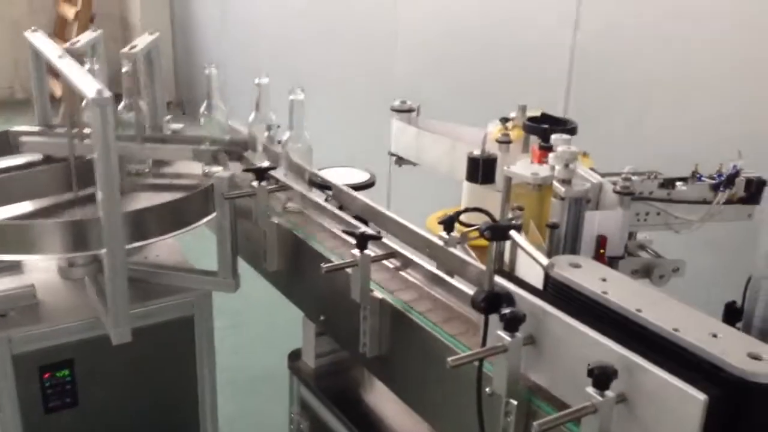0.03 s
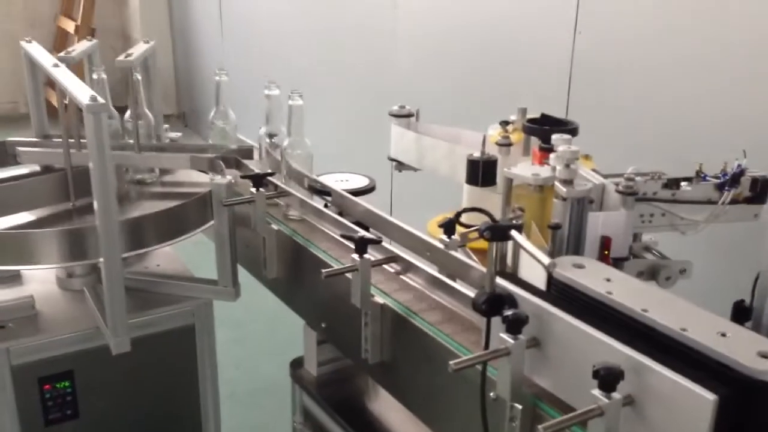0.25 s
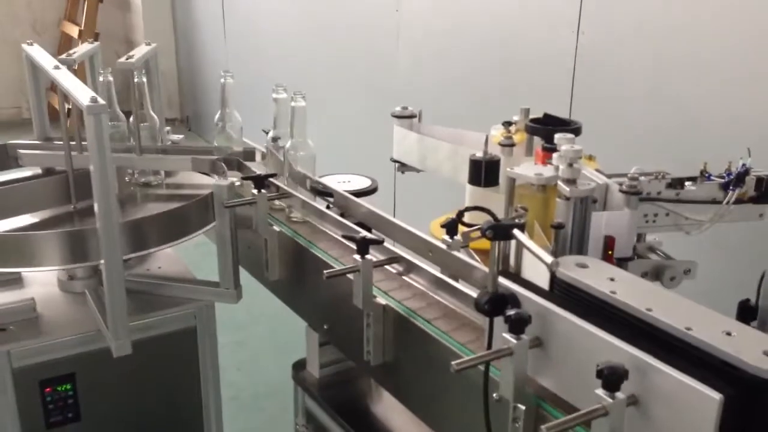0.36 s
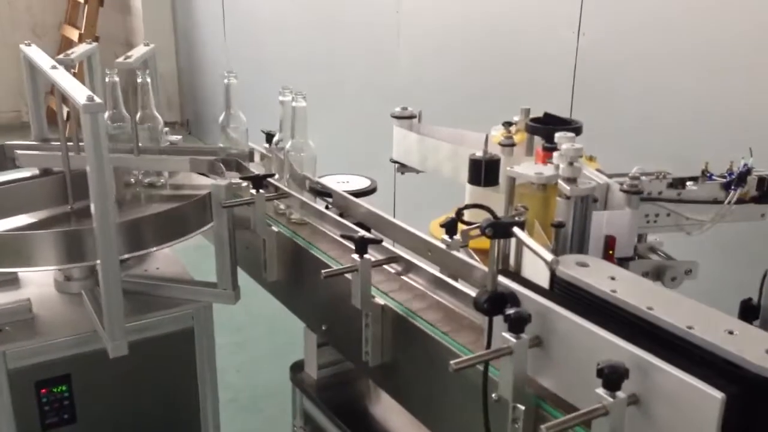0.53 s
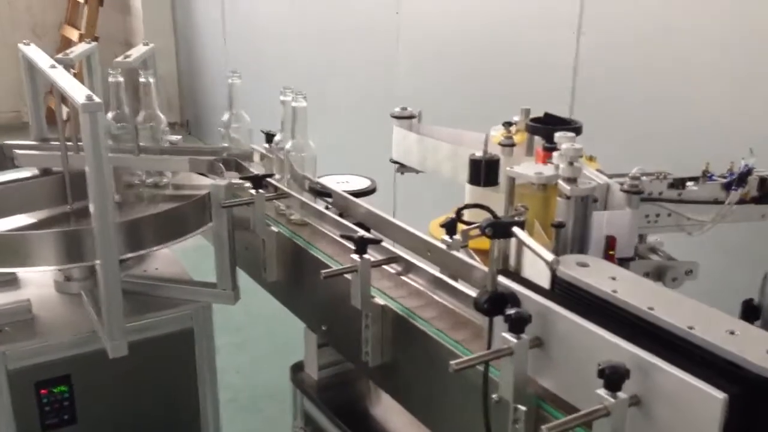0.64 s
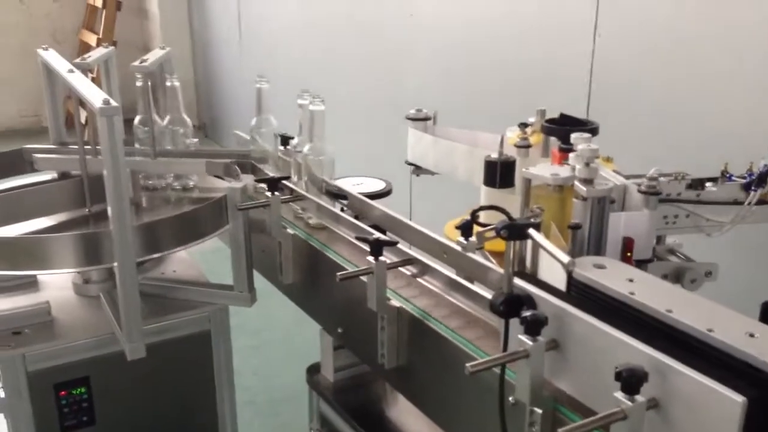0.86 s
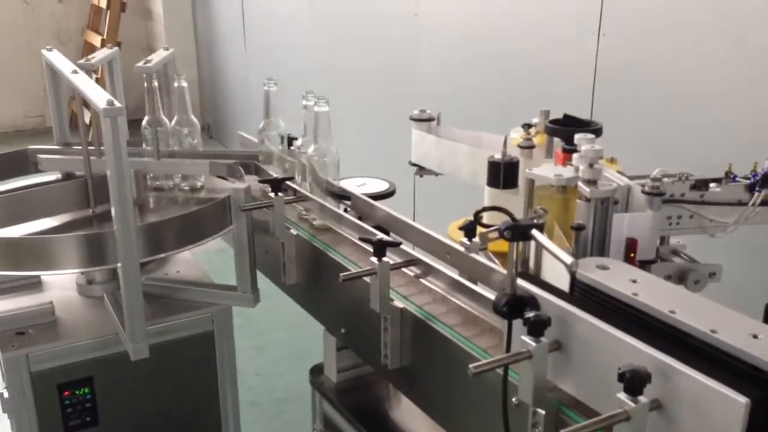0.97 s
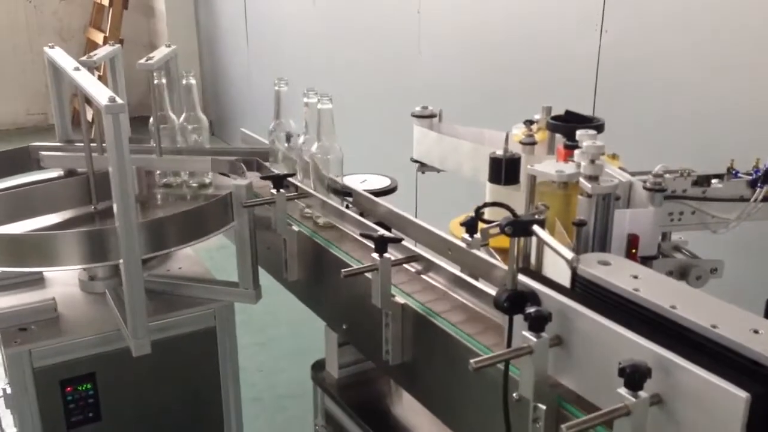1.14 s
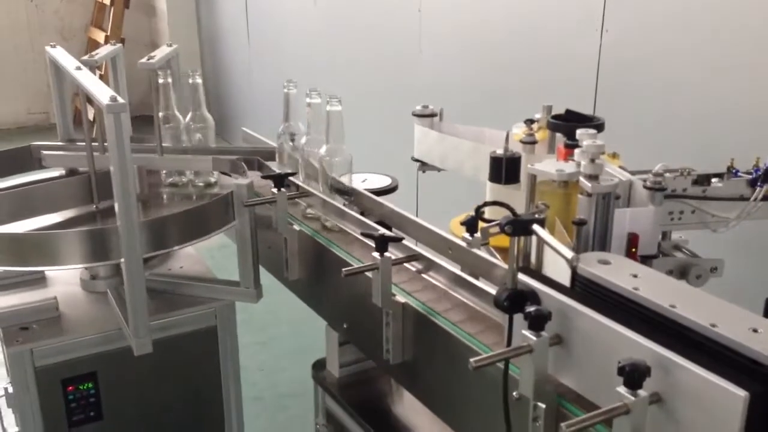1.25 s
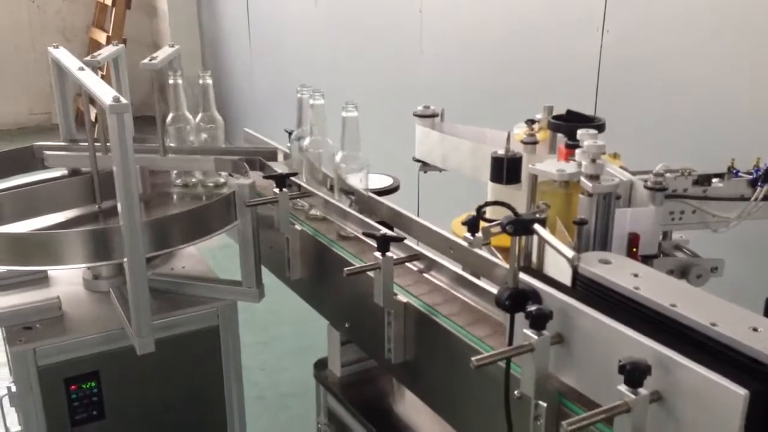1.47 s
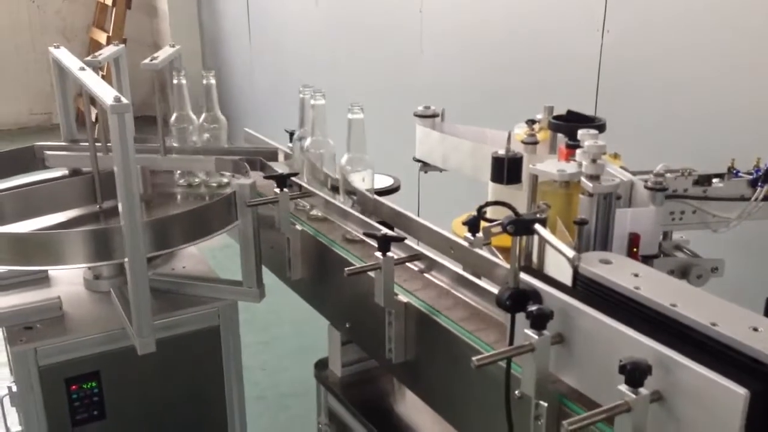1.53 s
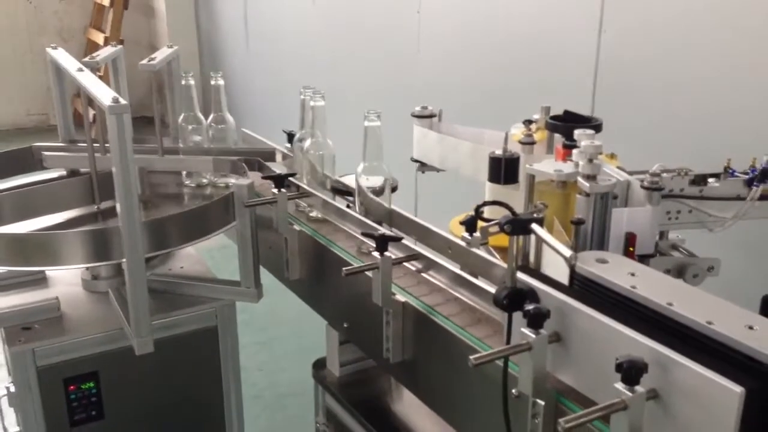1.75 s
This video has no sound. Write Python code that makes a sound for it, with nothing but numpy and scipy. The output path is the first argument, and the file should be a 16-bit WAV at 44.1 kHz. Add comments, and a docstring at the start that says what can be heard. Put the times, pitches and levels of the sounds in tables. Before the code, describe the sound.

Glass bottles knock and ring sharply in two clusters while a conveyor hums and hisses.

```python
"""A drive hums and a conveyor chain slides throughout, in a hard-walled workshop. At first something scrapes,
steel guide rails clack and the line groans. Then empty glass bottles jostle from a turntable onto the conveyor:
each impact is a short knock plus the free vibration of the bottles' walls. Near one second the machine gives a
short double rasp, the rails clack again and more bottles collide. The two loudest clinks, one in each cluster,
flatten hard at full scale."""
import sys
import numpy as np
from scipy import signal
from scipy.fft import rfft, irfft, next_fast_len
from scipy.io import wavfile
from scipy.ndimage import uniform_filter1d

SR = 44100
rng = np.random.default_rng(int(sys.argv[2]) if len(sys.argv) > 2 else 0)


def materialize(psi):
    """Save the field psi as 16-bit PCM at rate SR to the path in sys.argv[1].

    A 1-D psi becomes a single channel; in a 2-D psi each row is a channel.
    """
    bounded = np.clip(np.atleast_2d(psi).T, -1, 1)
    quanta = np.round(bounded * 32767).astype(np.int16)
    wavfile.write(sys.argv[1], SR, quanta)


N = 79380
T = np.arange(N) / SR


def amp(db):
    """Amplitude ratio: tenfold for every 20 dB."""
    return 10 ** (np.asarray(db) / 20)


def unit(x):
    """Normalisation to rms 1."""
    return x / np.sqrt(np.mean(x ** 2) + 1e-20)


def along(points, hz):
    """Interpolation of (frequency_hz, value) points on a logarithmic frequency axis."""
    point_hz, values = np.transpose(points)
    return np.interp(np.log(hz + 1), np.log(point_hz + 1), values)


def level(rows):
    """Amplitude envelope through (time_s, level_db) points."""
    return amp(np.interp(T, *np.transpose(rows)))


def fade(t60_s, t=T):
    """Damping: exponential decay by 60 dB in t60_s."""
    return np.exp(-np.log(1000) * t / t60_s)


def wobble(per_s):
    """Random modulation: straight lines between Gaussian knots."""
    knots = rng.standard_normal(size=256)
    return np.interp(T * per_s, np.arange(len(knots)), knots)


def filtered(x, response):
    """Linear filtering: the spectrum is multiplied by a frequency response."""
    size = next_fast_len(N + SR // 2)
    return irfft(rfft(x, size) * response(np.fft.rfftfreq(size, 1 / SR)), size)[:N]


def noise(spectrum):
    """Spectral shaping of white noise by (frequency_hz, level_db) points, at rms 1."""
    return unit(filtered(rng.standard_normal(N), lambda hz: amp(along(spectrum, hz))))


def add(track, start_s, sound):
    """Superposition of a delayed sound on a track."""
    start = max(0, round(start_s * SR))
    track[start:] += sound[:N - start]


def ticking(spectrum, per_s, t60_s):
    """A Poisson process of tiny impacts, each a decaying noise burst; rms 1 overall."""
    spread_db = 1.8
    hits = (rng.random(N) < per_s / SR) * amp(spread_db * rng.standard_normal(N))
    return unit(signal.fftconvolve(hits, fade(t60_s))[:N] * noise(spectrum))


def ring(modes, strikes, base_hz=0):
    """Modal vibration: each strike (start_s, level_db) adds energy to damped, wavering modes."""
    attack_s, wander_rad = 0.0004, 0.7
    flutter_db, flutter_per_s = 1, 70
    beat_db, beat_per_s = 1.8, 35  # uneven swelling of each mode, as when a bottle rocks
    blows = np.zeros(N)
    for start_s, level_db in strikes:
        blows[round(start_s * SR)] += amp(level_db) ** 2
    attack = 1 - np.exp(-T / attack_s)
    out = np.zeros(N)
    for hz, mode_db, t60_s in modes:
        energy = signal.fftconvolve(blows, (fade(t60_s) * attack) ** 2)[:N]
        phase = 2 * np.pi * (base_hz + hz) * T + wander_rad * wobble(flutter_per_s)
        swell_db = flutter_db * wobble(flutter_per_s) + beat_db * wobble(beat_per_s)
        out += np.sqrt(np.abs(energy)) * amp(mode_db + swell_db) * np.sin(phase)
    return out


def room(x, wet_db):
    """Reverberation: the workshop's diffuse field builds up and decays behind the direct sound."""
    # reverberation time: frequency_hz, t60_s
    decay_times = [(200, 0.22), (1500, 0.21), (4000, 0.3), (6000, 0.37)]
    build_up_s = 0.0058
    hz, t, bands = signal.stft(rng.standard_normal(SR), SR, nperseg=256)
    tail = signal.istft(bands * fade(along(decay_times, hz)[:, None], t), SR, nperseg=256)[1]
    tail *= 1 - np.exp(-T[:len(tail)] / build_up_s)
    return x + amp(wet_db) * signal.fftconvolve(x, tail / np.linalg.norm(tail))[:N]


def drive():
    """Rotating machinery: motor and gearbox radiate a low rush and tones modulated in level and phase."""
    # spectrum of the rush: frequency_hz, level_db
    rush_spectrum = [(25, -51), (60, -28), (110, -11.5), (165, -3.5), (290, -1), (390, -2.5), (650, 0),
                     (1000, -4.5), (1600, -17), (4000, -37.5)]
    # envelope of the rush: time_s, level_db
    rush_levels = [(0, -36), (.14, -31.5), (.27, -36.5), (.6, -38), (.85, -38), (1.0, -33.5), (1.08, -37),
                   (1.24, -38.5), (1.36, -32.5), (1.48, -36.5), (1.8, -34.5)]
    # tones of the hum: pitch_hz, level_db
    tones = [(181, -49), (374, -49.5), (430, -48.5), (606, -50.5)]
    swell_db, wander_rad = 3, 2.28
    hum = np.zeros(N)
    for pitch_hz, level_db in tones:
        peak = np.sqrt(2) * amp(level_db + swell_db * wobble(per_s=11.55))
        hum += peak * np.sin(2 * np.pi * pitch_hz * T + wander_rad * wobble(per_s=21.79))
    return level(rush_levels) * noise(rush_spectrum) + hum


def chain():
    """Sliding friction: the chain hisses under the bottles while its links tick at random."""
    # spectrum of hiss and ticks: frequency_hz, level_db
    spectrum = [(200, -26), (900, -16.5), (1500, 3), (2100, 1.5), (2800, -2.5), (3800, 0), (4600, -5),
                (5700, -11.5)]
    # envelope of both: time_s, level_db
    levels = [(0, -34), (.05, -34), (.2, -33.5), (.45, -35), (.7, -38), (.92, -35.5), (1.04, -35.5),
              (1.2, -38.5), (1.36, -31), (1.55, -33), (1.67, -31.5), (1.8, -35.5)]
    ticks = amp(-4) * ticking(spectrum, per_s=130, t60_s=0.045)
    return level(levels) * (noise(spectrum) + ticks)


def scrape():
    """Friction noise: a brief hiss in a few uneven surges."""
    # envelope of the hiss: time_s, level_db
    levels = [(0, -39), (.025, -49), (.037, -21.5), (.075, -29.5), (.103, -21.5), (.13, -21), (.155, -56),
              (.19, -21), (.235, -54), (.3, -72)]
    # spectrum of the hiss: frequency_hz, level_db
    spectrum = [(200, -20.5), (550, 7), (1000, -4), (2500, -9.5), (3400, 1), (4500, -5), (5600, -0.5)]
    return level(levels) * noise(spectrum)


def rails():
    """Heavily damped impacts: the guide rails give a hard snap and a short rattle, almost no ring."""
    # blows on the rails: start_s, rattle_db, snap_db
    clacks = [(0.1013, -20, -30), (0.1665, -18.5, -7.5), (.1718, -19.5, -23.5), (1.0640, -30, -27),
              (1.069, -32, -19)]
    # spectrum of a clack: frequency_hz, level_db
    spectrum = [(100, -20.5), (500, -2), (1500, -7.5), (2200, 3.5), (2800, 7), (3500, 9), (4300, 6),
                (5700, -4.5)]
    out = np.zeros(N)
    for start_s, rattle_db, snap_db in clacks:
        envelope = amp(rattle_db) * fade(t60_s=0.064) + amp(snap_db) * fade(t60_s=0.009)
        add(out, start_s, noise(spectrum) * envelope)
    return room(out, wet_db=-5)


def groans():
    """Roughness from fast phase modulation: short low tones of the line swell and fade."""
    # tones under Gaussian envelopes: centre_s, half_width_s, pitch_hz, peak_db
    tones = [(0.116, 0.05, 374, -36), (0.144, 0.0087, 546.5, -24.5), (0.191, 0.022, 500.4, -33),
             (.359, 0.014, 385, -31), (.415, 0.015, 771, -36), (1.174, 0.0071, 843, -28.5)]
    roughness_rad = 0.22
    out = np.zeros(N)
    for centre_s, half_width_s, pitch_hz, peak_db in tones:
        envelope = amp(peak_db) * np.exp(-((T - centre_s) / half_width_s) ** 2)
        out += envelope * np.sin(2 * np.pi * pitch_hz * T + roughness_rad * wobble(per_s=120))
    return out


def bottles():
    """Impact excitation: each contact cracks, knocks and rings the glass; hard ones add a bright crash."""
    # contacts: start_s, knock_db, low_ring_db, middle_ring_db, high_ring_db
    contacts = [(0.2435, -6.5, -20.5, -24.5, 2.5), (0.2486, -13, -8.5, -36, -7.5),
                (0.268, -29, -10.5, -32.5, -28), (0.3047, -22.5, -15.5, -45, -26),
                (0.3245, -25, -17, -44, -25), (0.356, -32, -31, -37.5, -37),
                (0.3955, -20.5, -24.5, -39.5, -45.5), (0.4206, -21, -34, -44.5, -53.5),
                (0.563, -27.5, -22, -53.5, -30), (.652, -24, -47, -54, -47),
                (0.7194, -16.5, -19.5, -22, -24), (.744, -27, -26.5, -42, -39),
                (0.8069, -20.5, -30, -33, -27.5), (.8620, -22, -25.5, -44.5, -35),
                (1.239, -8.5, -11.5, -11.5, -27.5), (1.2422, -6, -13.5, -10, -21),
                (1.2473, -15, -22, -17.5, -31), (1.269, -22, -33.5, -25, -35),
                (1.2800, -14.5, -36.5, -36, -41), (1.3324, -22.5, -28, -32, -29),
                (1.3462, -18.5, -41.5, -41, -31.5), (1.357, -21.5, -33, -33, -41),
                (1.3860, -35, -29, -21, -28), (1.414, -22.5, -46, -44, -29), (1.4735, -31, -35, -29.5, -48),
                (1.7118, -25, -36.5, -31, -32.5), (1.7832, -20.5, -45.5, -54, -46)]
    # main pitches of the three bottles: low_hz, middle_hz, high_hz
    pitches = (3564, 3842, 3873)
    # wall modes of each bottle: offset_from_pitch_hz, level_db, t60_s
    low_modes = [(2, -2.5, 0.28), (-36, -10.5, 0.35), (3.5, -22, 1), (68, -18, 0.27), (797.5, -20, 0.035),
                 (816, -41.5, 0.54), (-115, -7.5, 0.18)]
    middle_modes = [(3.5, 1, 0.19), (0.5, -14.5, 0.89), (-43, -10, 0.44), (126.5, -15.5, 0.72),
                    (276, -11, 0.16), (309, -16, 0.46), (535, -15, 0.047), (865, -26.5, 0.061)]
    high_modes = [(-5, 1, 0.097), (9.5, -13.5, 0.58), (-3.5, -32.5, 2.13), (-103, -23, 0.55),
                  (105.5, -26, 0.18), (238.5, -19.5, 0.1), (358, -30.5, 0.56)]
    # dull resonances of a contact: frequency_hz, level_db, t60_s
    knock_modes = [(1432, -9.5, 0.053), (1661, -7, 0.024), (1903, -19, 0.041), (2035, -8.5, 0.045),
                   (2745, -13, 0.03), (3090, -15, 0.067)]
    # spectrum of the crack: frequency_hz, level_db
    crack_spectrum = [(30, -29), (200, -18.5), (600, -9), (1000, -7), (1600, -1), (2300, 2), (3000, -16.5),
                      (4000, -1), (4800, -17), (5700, -27.5)]
    # dense, fast-dying wall modes that hard blows reach: frequency_hz, level_db
    crash_spectrum = [(2000, -23.5), (3000, -8), (3900, 7.5), (4400, 5), (4900, -1), (5700, -20)]
    crack_db, crash_db, crash_db_per_db = 0.5, 1.5, 1.65
    starts_s, knocks_db, *rings_db = np.transpose(contacts)
    knocks = ring(knock_modes, zip(starts_s, knocks_db))
    for start_s, knock_db in zip(starts_s, knocks_db):
        crack = amp(crack_db + knock_db) * noise(crack_spectrum) * fade(t60_s=0.011)
        crash = amp(crash_db + crash_db_per_db * knock_db) * noise(crash_spectrum) * fade(t60_s=0.09)
        add(knocks, start_s, crack + crash)
    rings = np.zeros(N)
    for pitch_hz, modes, levels_db in zip(pitches, (low_modes, middle_modes, high_modes), rings_db):
        rings += ring(modes, zip(starts_s, levels_db), pitch_hz)
    return room(rings + chatter(rings), wet_db=-9) + room(knocks, wet_db=-10.5)


def chatter(rings):
    """Contact rattle: touching bottles trade tiny random impacts in proportion to their vibration."""
    # spectrum of the impacts: frequency_hz, level_db
    spectrum = [(1500, -20.5), (3000, -8.5), (3600, -2), (4000, 1), (4500, -12), (5700, -12)]
    swing = np.sqrt(np.abs(uniform_filter1d(rings ** 2, size=441)))  # rms over 10 ms
    return amp(-17.5) * swing * ticking(spectrum, per_s=240, t60_s=0.03)


def rasps():
    """Structural resonance: short bright bursts come with the ring of the machine's frame."""
    # bursts: start_s, hold_s, hiss_db, ring_db
    bursts = [(0.787, 0.0088, -32.5, -45), (0.958, 0.0095, -16.5, -39.5), (0.979, 0.0098, -17, -28.5)]
    # spectrum of a burst: frequency_hz, level_db
    spectrum = [(200, -16), (800, -7.5), (2700, -9), (3300, 1), (4000, 0.5), (4500, -8.5), (5000, -0.5),
                (5700, -3.5)]
    # modes of the frame: frequency_hz, level_db, t60_s
    frame_modes = [(386, 4.5, 0.04), (1503, 2, 0.19), (1960, -4, 0.32), (2175, -1.5, 0.13), (3640, 5, 0.18),
                   (5040, -8.5, 0.21), (5630, 6.5, 0.084)]
    out = ring(frame_modes, [(start_s, ring_db) for start_s, _, _, ring_db in bursts])
    for start_s, hold_s, hiss_db, _ in bursts:
        envelope = fade(t60_s=0.11, t=np.maximum(T - hold_s, 0))
        add(out, start_s, amp(hiss_db) * noise(spectrum) * envelope)
    return room(out, wet_db=-16)


def scene():
    """Superposition: the pressures of all sources add at one microphone."""
    return (bottles() + rails() + rasps() + drive() + groans() + chain() + scrape())[None]


def record(dry):
    """Nonlinear distortion: the band-limited sound saturates at full scale, then the treble softens."""
    # response after saturation: frequency_hz, gain_db
    output_response = [(6000, 0), (9500, -2.5), (10500, -33), (14000, -8), (17000, -9.5)]
    band_hz, top_hz = 5720, 17000
    knee_exponent, skew = 27, 0.0022
    narrow = filtered(dry[0], lambda hz: 1 / np.sqrt(1 + (hz / band_hz) ** 140))  # order-70 low-pass
    clipped = narrow / (1 + np.abs(narrow) ** knee_exponent) ** (1 / knee_exponent)
    lopsided = clipped + skew * clipped ** 2
    return filtered(lopsided, lambda hz: amp(along(output_response, hz)) * (hz < top_hz))[None]


dry = scene()
out = record(dry)
materialize(out)
```